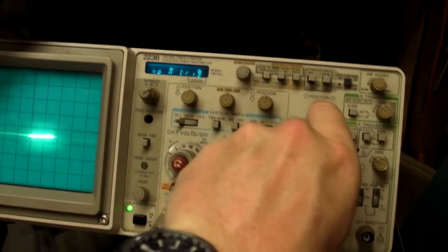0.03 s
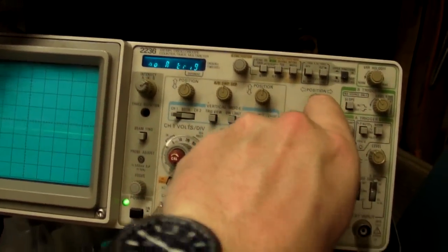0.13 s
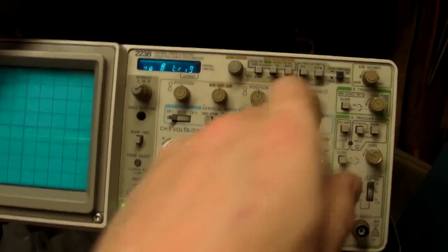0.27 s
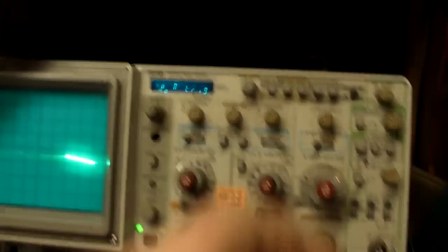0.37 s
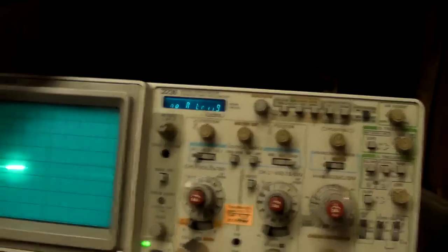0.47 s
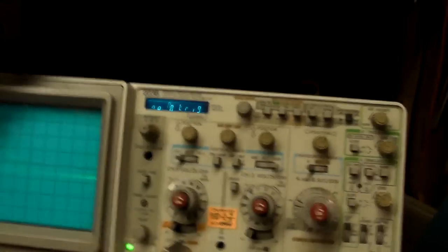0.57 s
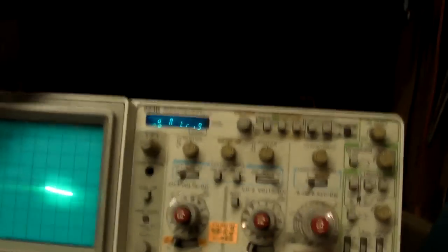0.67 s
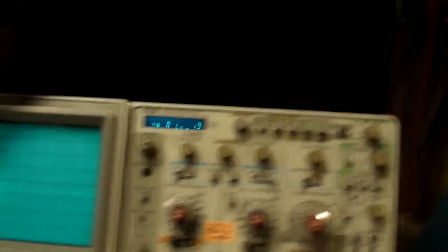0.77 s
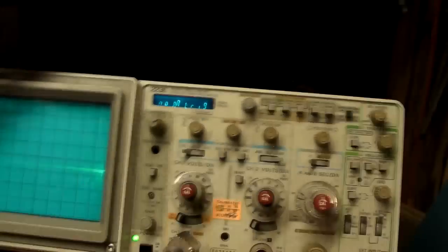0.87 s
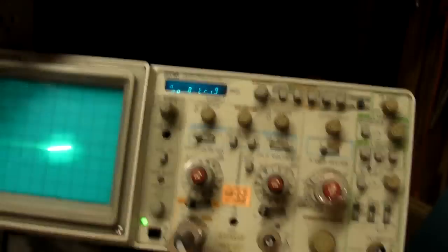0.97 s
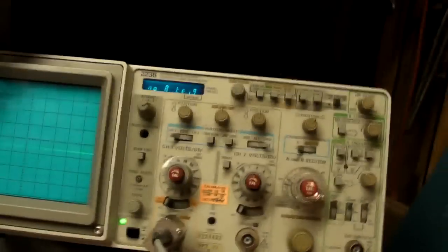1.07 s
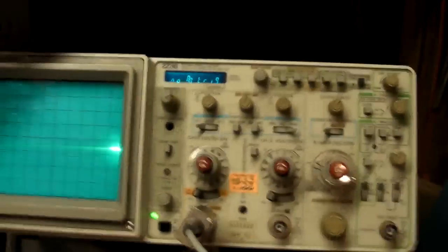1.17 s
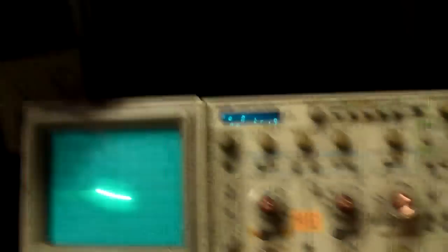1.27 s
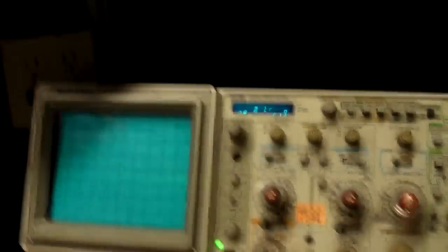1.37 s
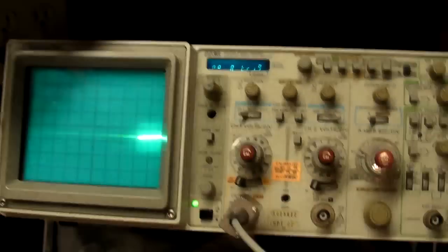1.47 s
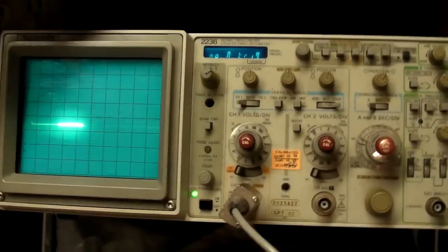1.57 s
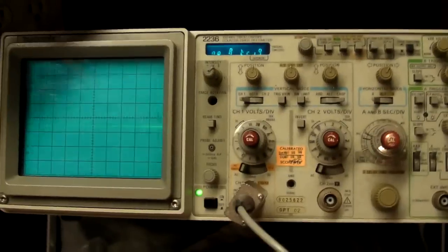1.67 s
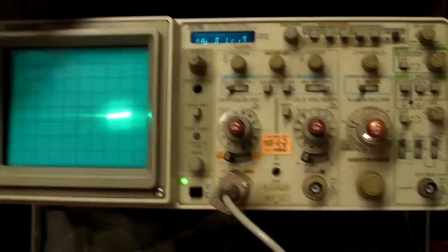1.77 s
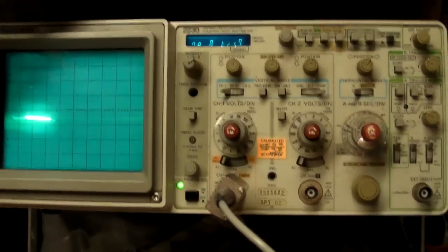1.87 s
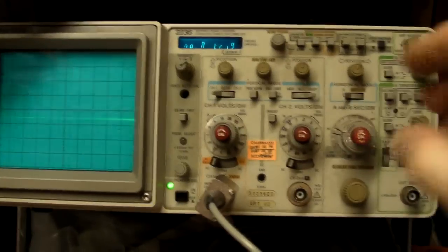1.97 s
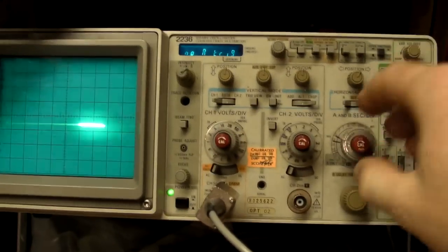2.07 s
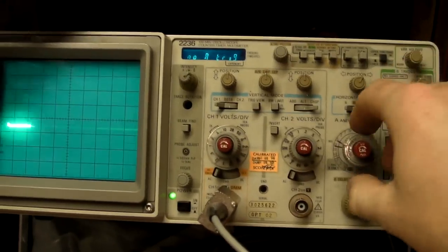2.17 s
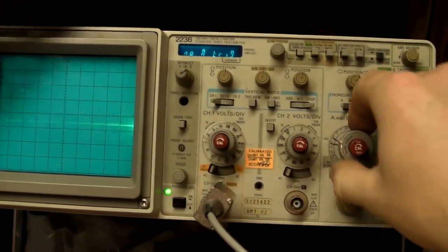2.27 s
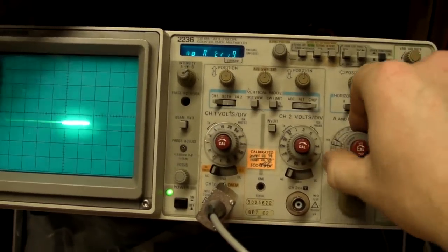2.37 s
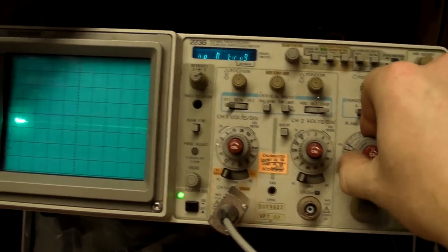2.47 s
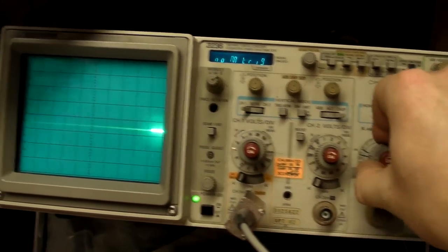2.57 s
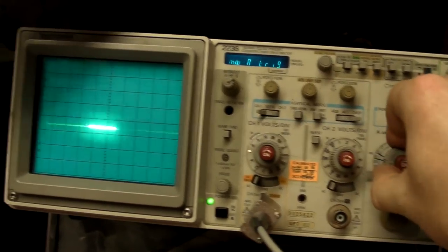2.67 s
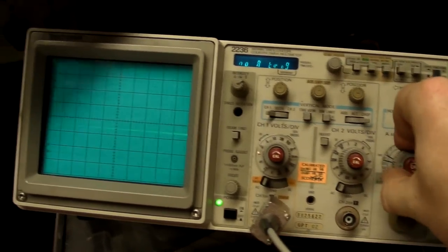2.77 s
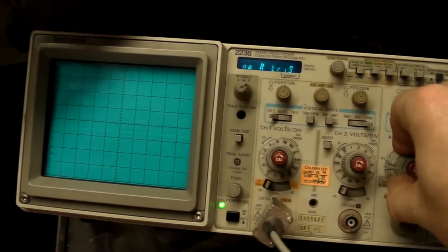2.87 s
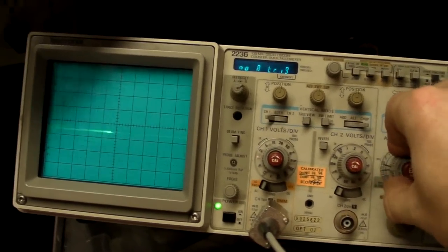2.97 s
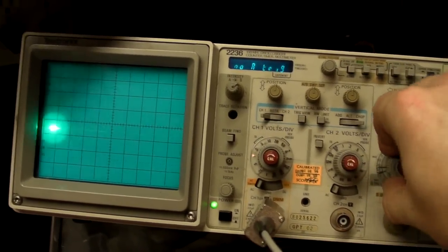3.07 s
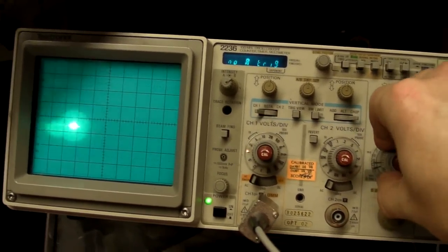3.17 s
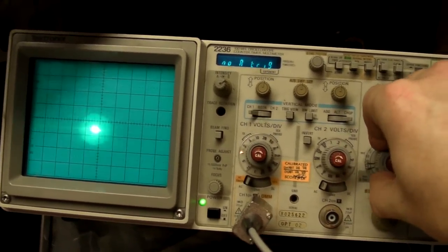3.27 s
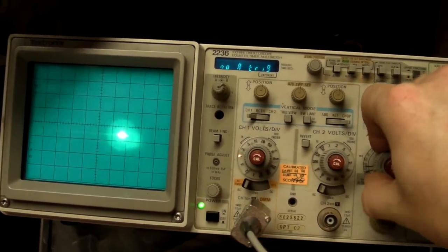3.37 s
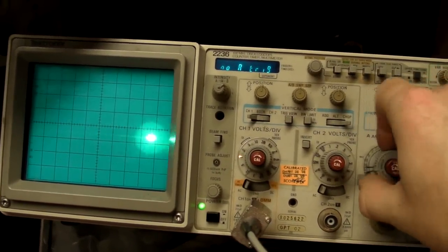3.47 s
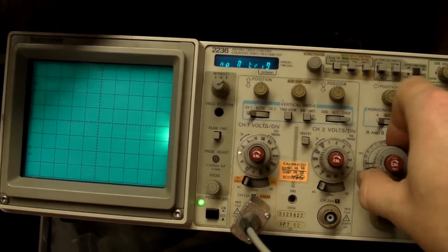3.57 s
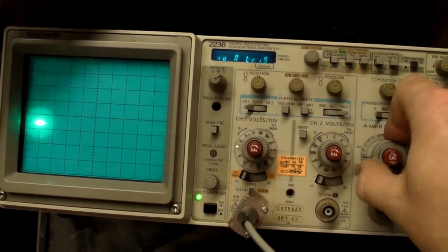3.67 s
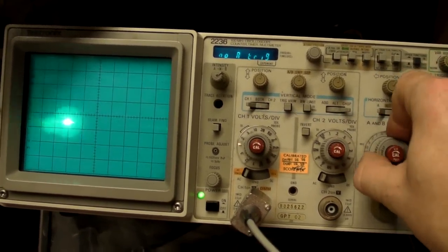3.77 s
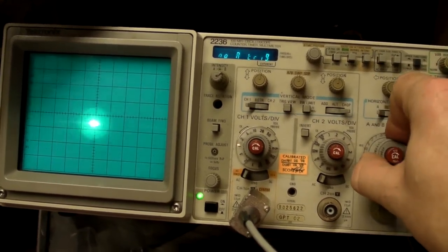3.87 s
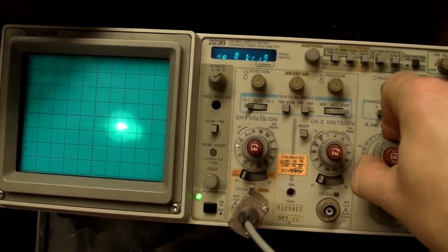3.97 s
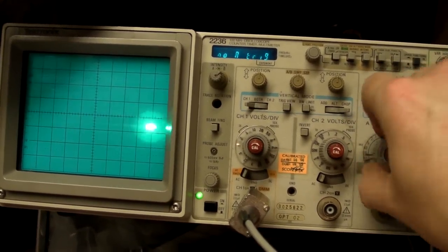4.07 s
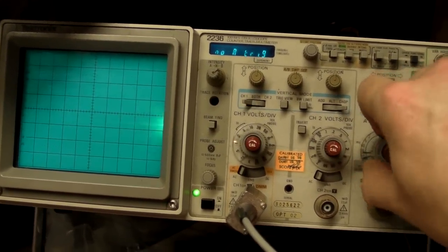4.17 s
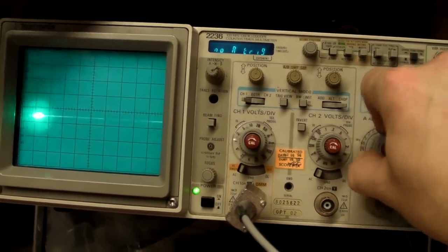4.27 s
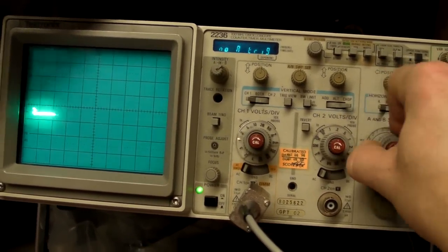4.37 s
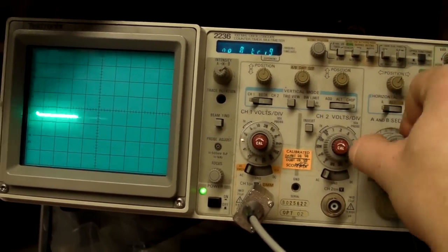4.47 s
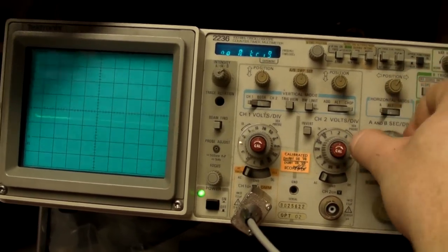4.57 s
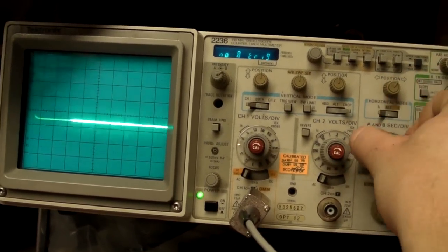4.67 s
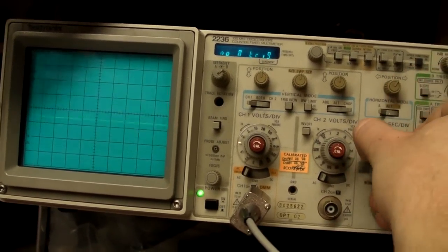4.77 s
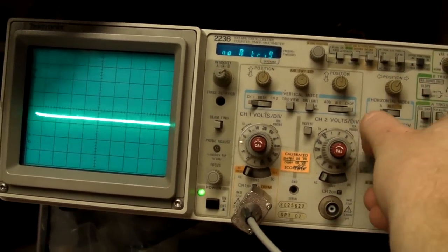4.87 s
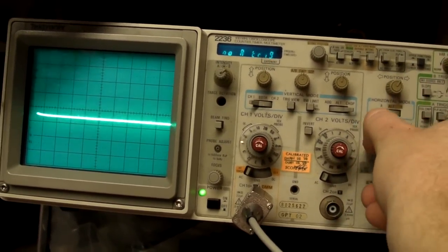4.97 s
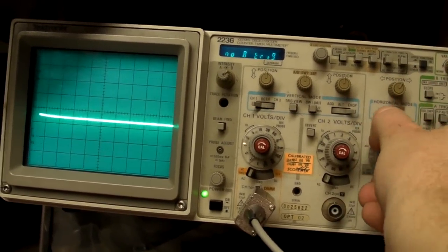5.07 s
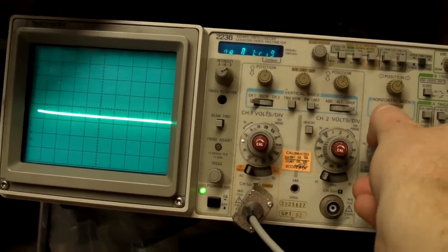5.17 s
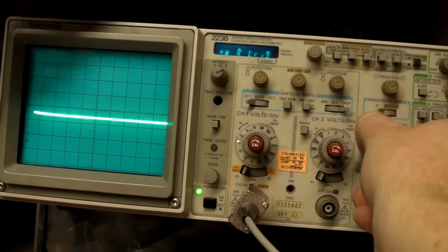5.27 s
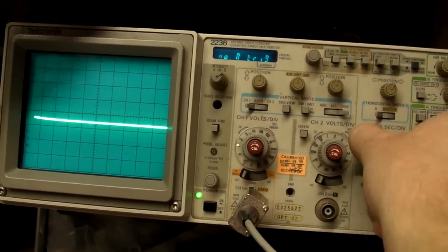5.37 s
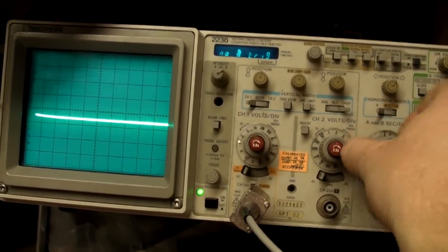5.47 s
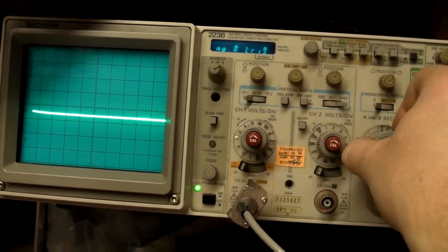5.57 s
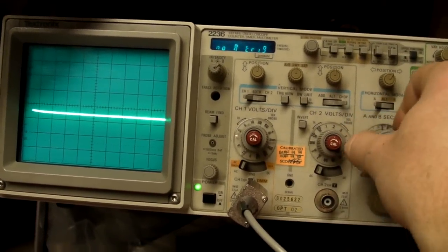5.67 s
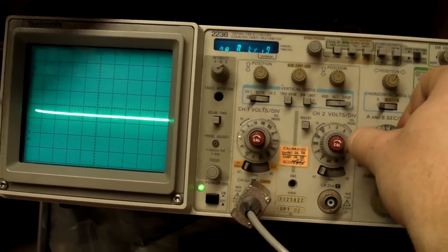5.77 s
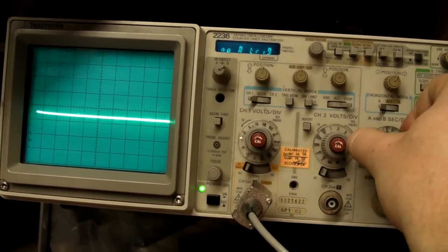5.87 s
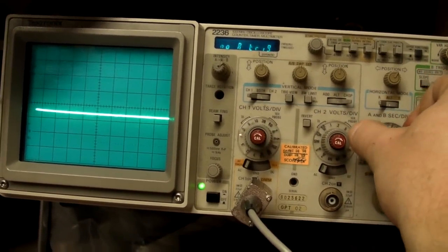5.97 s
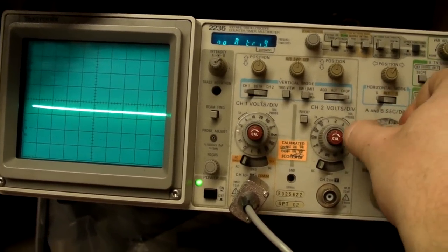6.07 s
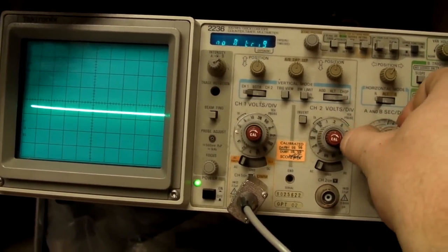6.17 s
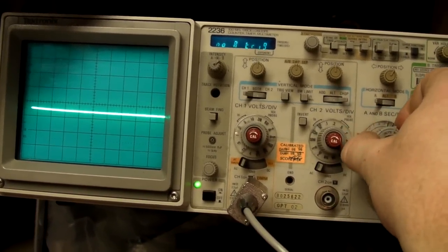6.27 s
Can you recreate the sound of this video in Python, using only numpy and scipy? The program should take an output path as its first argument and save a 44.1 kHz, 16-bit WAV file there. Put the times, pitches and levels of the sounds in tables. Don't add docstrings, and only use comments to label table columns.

```python
import sys
import numpy as np
from scipy import signal
from scipy.fft import rfft, irfft
from scipy.io import wavfile
from scipy.ndimage import uniform_filter1d

SR = 44100
rng = np.random.default_rng(int(sys.argv[2]) if len(sys.argv) > 2 else 0)


def amp(db):
    return 10 ** (np.asarray(db, float) / 20)


def write(x):
    x = np.atleast_2d(x).T
    wavfile.write(sys.argv[1], SR, np.round(np.clip(x, -1, 1) * 32767).astype(np.int16))


N = 278712
T = np.arange(N) / SR
# t/s, level/dB
VENT_NEARNESS = [(0.0, -4.5), (.42, -1), (0.6, 0.4), (0.9, 3.5), (1.21, 3.5), (1.67, 1.5), (2.8, 0.2),
                 (4.2, -1.5), (6.32, -1.8)]


def evened(x):
    return x / np.sqrt(np.mean(x ** 2) + 1e-20)


def peaked(x):
    return x / np.max(abs(x))


def read(points, hz):
    f, value = np.transpose(points)
    return np.interp(np.log(hz + 1), np.log(f + 1), value)


def curve(rows):
    return np.interp(T, *np.transpose(rows))


def add(mix, start_s, sound):
    part = mix[round(start_s * SR):][:len(sound)]
    part += sound[:len(part)]


def played(table, source):
    out = np.zeros(N)
    for start_s, *row in table:
        add(out, start_s, source(*row))
    return out


def smooth_noise(size, width):
    once = uniform_filter1d(rng.standard_normal(size), width)
    return evened(uniform_filter1d(once, width))


def coloured(points, size):
    gain = amp(read(points, np.fft.rfftfreq(size, 1 / SR)))
    return evened(irfft(rfft(rng.standard_normal(size)) * gain, size))


def resonate(x, hz, width_hz):
    turn = np.exp(2j * np.pi * hz * np.arange(len(x)) / SR)
    r = np.exp(-np.pi * abs(width_hz) / SR)
    return 2 * (turn * signal.lfilter([1 - r], [1, -r], x / turn)).real


def narrow_noise(size, hz, width_hz):
    return resonate(resonate(rng.standard_normal(size), hz, width_hz), hz, width_hz)


def ring(modes, t, spread=0.):
    detune = 1 + spread * rng.standard_normal(len(modes))
    out = np.zeros(len(t))
    for k, (hz, db, t60_s) in enumerate(modes):
        out += (-1) ** k * amp(db - 60 * t / t60_s) * np.sin(2 * np.pi * hz * detune[k] * t)
    return out


def burst(spectrum, decays, size):
    hz, t, z = signal.stft(coloured(spectrum, size), SR, nperseg=64)
    return signal.istft(z * amp(-60 * t / read(decays, hz)[:, None]), SR, nperseg=64)[1][:size]


def echoes(x, t60_s, start_s):
    t = T[:round(t60_s * SR)]
    tail = rng.standard_normal(len(t)) * amp(-60 * t / t60_s) * (t > start_s)
    return signal.oaconvolve(x, tail / np.linalg.norm(tail))[:N]


def fan_air():
    # f/Hz, level/dB per Hz
    room_spectrum = [(88, -41.5), (150, -1.5), (315, -3.5), (440, 2), (600, -9), (1340, -16), (1900, -14),
                     (2500, -27.5), (3600, -26.5), (5000, -30), (7300, -29), (8500, -35), (12000, -35.5),
                     (16500, -40.5)]
    # f/Hz, width/Hz, level/dB
    duct_humps = [(396, 81, -66.5), (452.7, 47, -70.5), (1015, 47, -82.5), (1220, 20, -87.5),
                  (1946, 20, -81), (3650, 87, -93), (6590, 390, -93.5)]
    wide = amp(-67.0) * coloured(room_spectrum, N)
    for hz, width_hz, db in duct_humps:
        wide += amp(db) * evened(narrow_noise(N, hz, width_hz))
    low = signal.sosfiltfilt(signal.butter(4, 2200, fs=SR, output="sos"), wide)
    opens_s, shaded_db, follows = 0.46, -1, 0.15
    shade = np.clip((opens_s - T) / 0.089, 0, 1)
    return low + (wide - low) * amp(follows * curve(VENT_NEARNESS) + shaded_db * shade)


def whines():
    fan_hz, fan_db = 1624, -67
    scan_hz, scan_db, scan_on_s = 7867.1, -72.5, 0.74
    flips_per_s, first_flip_s = 29.97, 0.7674
    drift = 0.42 * evened(uniform_filter1d(rng.standard_normal(N), 2000))
    fan = amp(fan_db + curve(VENT_NEARNESS)) * np.sqrt(2) * np.sin(2 * np.pi * fan_hz * T + drift)
    flips = np.tanh(24.0 * np.sin(np.pi * flips_per_s * (T - first_flip_s)))
    scan = amp(scan_db) * np.sqrt(2) * flips * np.sin(2 * np.pi * scan_hz * T)
    return fan + scan * np.clip((T - scan_on_s) / 0.01, 0, 1)


def grip_rumble():
    # t/s, level/dB
    grip_level = [(0.0, -65.5), (0.45, -66), (0.81, -55.5), (1.3, -60.5), (1.55, -61), (1.88, -53),
                  (2.06, -66), (2.41, -50.5), (2.67, -72.5), (3.15, -60.5), (3.71, -62), (3.92, -75),
                  (4.47, -64), (4.81, -57.5), (5.21, -76.5), (5.45, -61), (5.72, -59), (5.86, -72)]
    # f/Hz, level/dB per Hz
    rumble_spectrum = [(12, -47), (20, -26), (65, -6.5), (103, -3), (118, -5), (161, -10), (260, -24.5),
                       (320, -25), (420, -87.5), (700, -120)]
    lumps = amp(3.0 * smooth_noise(N, 1500))
    return amp(curve(grip_level)) * evened(coloured(rumble_spectrum, N) * lumps)


def tick(db, hz, width_hz, t60_s, wide_db):
    # f/Hz, level/dB per Hz
    creak_spectrum = [(1000, -27), (1700, -3), (2870, -11), (3920, -4.5), (4910, -13.5), (5440, -4),
                      (8070, -4), (9370, -13), (16000, -21.5)]
    t = T[:round(0.15 * SR)]
    lost_top_db = 0.5 * min(db + 27, 0)
    duller = [(f, level + lost_top_db * (f > 9000)) for f, level in creak_spectrum]
    wide = burst(duller, [(1000, t60_s), (15000, t60_s * 1.4)], size=len(t))
    puff = narrow_noise(len(t), hz, width_hz) * amp(-60 * t / t60_s)
    scrape = peaked(peaked(puff) + amp(wide_db) * peaked(wide))
    return amp(db) * scrape * np.minimum(t / 0.003, 1)


def touches():
    # t/s, peak/dB, centre f/Hz, t60/s, wide share/dB
    creak_events = [(0.2613, -55.5, 1790, 0.072, -4), (0.6732, -44.5, 5400, 0.014, 1),
                    (0.711, -42.5, 7040, 0.026, 1.5), (0.919, -56, 1620, 0.1, -14),
                    (0.9524, -59, 1795, 0.011, -2), (1.033, -52.5, 1920, 0.034, -11),
                    (1.12, -61.5, 7560, 0.042, 4), (1.1824, -51, 1660, 0.036, -2),
                    (1.412, -51.5, 1780, 0.045, 2), (1.7472, -21.5, 6630, 0.019, 2),
                    (2.163, -36.5, 7030, 0.034, 2), (2.1703, -39, 3980, 0.024, -16),
                    (3.06, -47.5, 7600, 0.027, 24), (3.8752, -53, 7100, 0.025, 8),
                    (4.268, -37, 1960, 0.03, 4), (5.5583, -51.5, 5200, 0.053, 5)]
    # t/s, peak/dB, centre f/Hz, t60/s
    knock_events = [(.262, -54.5, 800, 0.11), (0.712, -46, 1520, 0.028), (0.921, -51, 6850, 0.056),
                    (0.951, -52, 1760, 0.076), (1.12, -50, 1380, 0.061), (1.182, -42, 1390, 0.017),
                    (1.747, -53, 1900, 0.035), (1.749, -45, 3890, 0.017), (1.75, -43, 5480, 0.027),
                    (1.748, -58, 970, 0.057), (2.164, -54.5, 1080, 0.039), (3.038, -50.5, 323, 0.026),
                    (1.827, -44.5, 500, .025), (4.27, -48.5, 665, 0.065), (5.558, -52, 4150, 0.026)]
    rows = [(s, db, hz, 1500, t60_s, wide_db) for s, db, hz, t60_s, wide_db in creak_events]
    rows += [(s, db, hz, 200 + 0.14 * hz, t60_s, -33) for s, db, hz, t60_s in knock_events]
    return played(rows, tick)


def thump(db, hz, t60_s, rise_s, sag):
    t = T[:round(0.3 * SR)]
    turns = np.cumsum(hz * (1 + sag * np.exp(-t / 0.008))) / SR
    envelope = amp(-60 * t / t60_s) * (1 - np.exp(-(t / rise_s) ** 2))
    push = 0.11
    return amp(db) * peaked((np.sin(2 * np.pi * turns) + push) * envelope)


def thumps():
    # t/s, peak/dB, f/Hz, t60/s
    finger_shifts = [(0.43, -48.5, 87, 0.071), (0.628, -46.5, 108, 0.18), (0.69, -41, 41.6, .3),
                     (0.742, -38.5, 114, 0.093), (.93, -56, 43.4, .2), (1.22, -54, 42, 0.47),
                     (0.81, -50.5, 67.7, 0.094), (0.926, -40, 120, 0.1), (1.11, -38.5, 84, 0.1),
                     (1.138, -41.5, 93, 0.085), (1.244, -45, 122, 0.2), (1.475, -36.5, 90, 0.034),
                     (2.31, -44.5, 90, 0.21), (2.37, -50, 100, 0.17), (2.412, -44.5, 114.5, 0.082),
                     (2.479, -48, 95, 0.19), (3.735, -35, 108, 0.097), (3.791, -46, 102, 0.04),
                     (4.236, -45, 111, 0.24), (4.268, -37, 106.7, 0.16), (4.308, -39, 103, 0.058),
                     (4.753, -38, 136, 0.08), (5.358, -53.5, 123, 0.26), (5.654, -45, 120.3, 0.2),
                     (5.933, -51, 90, 0.082), (6.271, -44, 94, 0.09)]
    # t/s, peak/dB, f/Hz, t60/s, rise/s
    hard_blows = [
        (0.674, -29.5, 95.8, 0.11, 0.035),
        (0.688, -49, 174, 0.12, 0.011),
        (1.404, -30, 59.3, 0.11, 0.0025),
        (1.8356, -21.5, 54.5, 0.087, 0.0036),
    ]
    short_slaps = [
        (1.8245, -34, 90, .02, .004),
        (1.8302, -22, 150, .013, .002),
    ]
    rise_s, shift_sag, blow_sag = 0.0069, 0.41, 2.6
    rows = [(*row, rise_s, shift_sag) for row in finger_shifts]
    rows += [(*row, blow_sag) for row in hard_blows]
    rows += [(*row, 0) for row in short_slaps]
    return played(rows, thump)


def detent_step(snap_db, case_db, lean_db, panel_db):
    # f/Hz, level/dB per Hz
    snap_spectrum = [(290, -22), (500, -9.5), (1020, -20), (1250, -23), (1460, -15), (1930, -14.5),
                     (2460, -22), (3200, -16.5), (3650, -19.5), (6330, -8), (9630, -17), (12700, -22),
                     (16000, -20.5)]
    # f/Hz, t60/s
    snap_decays = [(600, 0.34), (1500, 0.11), (3000, 0.11), (6000, .08), (9000, 0.031), (15000, 0.04)]
    # f/Hz, level/dB, t60/s
    spring_modes = [(5190, -5, 0.025), (5500, -8, 0.03), (5960, 0, 0.026), (6560, -2, 0.026),
                    (7150, -9, 0.03), (7500, -3, 0.025)]
    # f/Hz, level/dB, t60/s
    case_modes = [(388, 2, .2), (425, 1, .19)]
    # f/Hz, level/dB, t60/s
    small_case_modes = [(359.7, -10, 0.28), (455, -8.5, 0.24), (516, -6, 0.16), (572.3, -6, 0.079),
                        (603.5, -10.5, 0.13), (836, -18.5, 0.11)]
    # f/Hz, level/dB, t60/s
    panel_modes = [(1076, -3.5, 0.036), (1497.5, -2.5, 0.13), (1598, -4.5, 0.048), (1709, 3.5, 0.041)]
    t = T[:round(0.25 * SR)]
    hits = rng.random(len(t)) < 900 / SR
    chatter = hits * rng.standard_normal(len(t)) * amp(-60 * t / 0.047)
    chatter[0] = 1

    snap = burst(snap_spectrum, snap_decays, size=len(t)) * (1 + 1.9 * np.exp(-(t / 0.032) ** 2))
    spring = signal.fftconvolve(chatter, ring(spring_modes, t, spread=0.025))[:len(t)]
    snap = peaked(peaked(snap) + amp(-9.5) * peaked(spring))
    top = signal.sosfilt(signal.butter(4, 9000, "high", fs=SR, output="sos"), snap)
    snap = snap + (amp(-0.54 * (snap_db + 31.5)) - 1) * top

    mode_db = (case_db + lean_db / 2, case_db - lean_db / 2)
    pair = [(hz, db + level, t60_s) for (hz, db, t60_s), level in zip(case_modes, mode_db)]
    case = amp(11.0) * ring(pair, t, spread=0.0032)
    case += amp(case_db + 11.5) * ring(small_case_modes, t, spread=0.031)
    panel = signal.fftconvolve(chatter, ring(panel_modes, t, spread=0.052))[:len(t)]
    ringing = case + amp(panel_db + 10.0) * peaked(panel)
    return amp(snap_db) * snap * np.minimum(t / 0.0024, 1) + ringing * (1 - np.exp(-(t / 0.0069) ** 2))


def switch():
    # t/s, snap peak/dB, case ring/dB, lower minus upper case mode/dB, panel ring/dB
    switch_steps = [
        (2.8937, -27.5, -49.5, -2.3, -51),
        (3.1202, -25.5, -49.5, -2.5, -56),
        (4.373, -26.5, -55.5, 15.5, -61),
        (4.4097, -28, -49, -3, -62),
        (4.5187, -30, -53.5, 6, -50),
        (4.6377, -27, -51.5, 7.5, -60.5),
        (4.7697, -31, -52, 3, -61),
        (4.9038, -28, -53, 1.5, -53.5),
        (5.1074, -27.5, -53.5, -6.5, -54),
        (5.9975, -26, -51.5, 2, -49.5),
    ]
    return played(switch_steps, detent_step)


def bird_note(length_s, start_hz, end_hz, db, depth_hz):
    t = T[:round(length_s * SR)]
    rate_wander, pitch_wander, level_wander = (smooth_noise(len(t), 40) for _ in range(3))
    warble = np.sin(2 * np.pi * np.cumsum(570 * (1 + 0.13 * rate_wander)) / SR) + 0.25 * pitch_wander
    hz = np.linspace(start_hz, end_hz, len(t)) + depth_hz * warble
    tone = np.sqrt(2) * np.sin(2 * np.pi * np.cumsum(hz) / SR)
    return amp(db + 1.7 * level_wander) * tone * signal.windows.tukey(len(t), min(0.04 / length_s, 0.6))


def bird():
    # t/s, low whistle length/s, level/dB, high answer delay/s, answer level/dB
    whistle_pairs = [
        (4.424, 0.095, -65, .065, -71),
        (4.771, 0.092, -57.5, 0.069, -69.5),
        (5.048, .125, -65, .115, -64),
    ]
    # t/s, length/s, level/dB, f/Hz, warble depth/Hz
    buzz_events = [
        (5.249, 0.049, -67.5, 7220, 447),
        (5.318, .33, -64.5, 5780, 547),
    ]
    # delay/s, length/s, level/dB, start f/Hz, end f/Hz
    trill_turn = [
        (0, 0.03, -65.5, 3463, 3020),
        (0.0205, 0.02, -67.5, 3600, 3030),
        (0.089, .075, -63.5, 7340, 7310),
        (.139, .038, -68, 5060, 5430),
    ]
    turn_warble_hz = (50, 50, 110, 380)
    trill_s, trill_period_s, trill_turns = 5.693, 0.212, 3
    rows = []
    for s, length_s, low_db, after_s, high_db in whistle_pairs:
        rows.append((s, length_s, 3720, 3790, low_db, 9.8))
        rows.append((s + after_s, 0.055, 6060, 6150, high_db, 320))
    for s, length_s, db, hz, depth_hz in buzz_events:
        rows.append((s, length_s, hz, hz, db, depth_hz))
    for k in range(trill_turns):
        turn_s = trill_s + k * trill_period_s
        for (delay_s, length_s, db, start_hz, end_hz), depth_hz in zip(trill_turn, turn_warble_hz):
            rows.append((turn_s + delay_s, length_s, start_hz, end_hz, db, depth_hz))
    return played(rows, bird_note)


def scene():
    near = touches() + switch()
    song = bird()
    mono = fan_air() + whines() + grip_rumble() + thumps()
    mono += near + amp(-8.0) * echoes(near, 0.12, 0.0029)
    mono += amp(-2.0) * song + amp(-3.0) * echoes(song, 0.27, 0.0011)
    return np.array([mono, mono])


def camera_grain(x):
    # f/Hz, level/dB
    coarse_step = [(200, -25), (1500, -13), (3000, -4.5), (8000, -2.5), (16000, 5.5)]
    # f/Hz, level/dB
    finest_step = [(200, -100), (1500, -84), (2300, -67), (7500, -66), (8600, -68), (16000, -70)]
    # f/Hz, level/dB
    channel_difference = [(60, -32.5), (250, -31.5), (600, -19), (1500, -21), (3000, -9), (5000, -7.5),
                          (8000, -14.5), (14000, -11.5)]
    size, lead, top_hz = 1024, 885, 15830
    n, k = np.arange(2 * size), np.arange(size) + 0.5
    window = np.sqrt(2 / size) * np.sin(np.pi * (n + 0.5) / (2 * size))
    basis = window * np.cos(np.pi / size * np.outer(k, n + 0.5 + size / 2))
    padded = np.pad(x, (size + lead, 3 * size))
    at = np.arange(len(padded) // size - 1)[:, None] * size + n
    lines, hz = padded[at] @ basis.T, k * SR / (2 * size)

    band = np.sqrt(abs(uniform_filter1d(lines ** 2, size=24, axis=1)))
    wander_db = 2.5 * np.repeat(rng.standard_normal((len(lines), size // 32)), 32, axis=1)
    grain = np.maximum(band * amp(read(coarse_step, hz)), amp(read(finest_step, hz) + wander_db))
    kept = grain * np.round(lines / grain) * (hz < top_hz)

    near = np.sqrt(abs(uniform_filter1d(kept ** 2, size=25, axis=1)))
    usual = np.exp(np.mean(np.log(near + amp(read(finest_step, hz) - 12)), axis=0))
    follows = np.where(hz < 8300, 0.3, 1)
    unlike_level = usual * (near / usual) ** follows * amp(read(channel_difference, hz))
    unlike = unlike_level * rng.standard_normal(kept.shape)
    frames = np.array([kept + unlike, kept - unlike]) @ basis
    out = (frames[:, 1:, :size] + frames[:, :-1, size:]).reshape(2, -1)
    return out[:, lead:lead + N]


def top_cut(x):
    return signal.sosfilt(signal.butter(12, 16430, fs=SR, output="sos"), x)


def record(dry):
    hiss = signal.sosfilt(signal.butter(12, 15700, fs=SR, output="sos"), rng.standard_normal(dry.shape))
    mix = camera_grain(dry[0]) + amp(-97) * hiss
    return top_cut(mix)


dry = scene()
out = record(dry)
write(out)
```